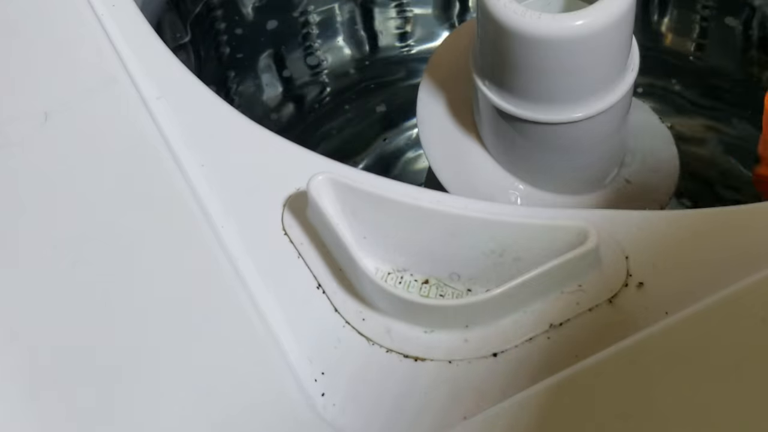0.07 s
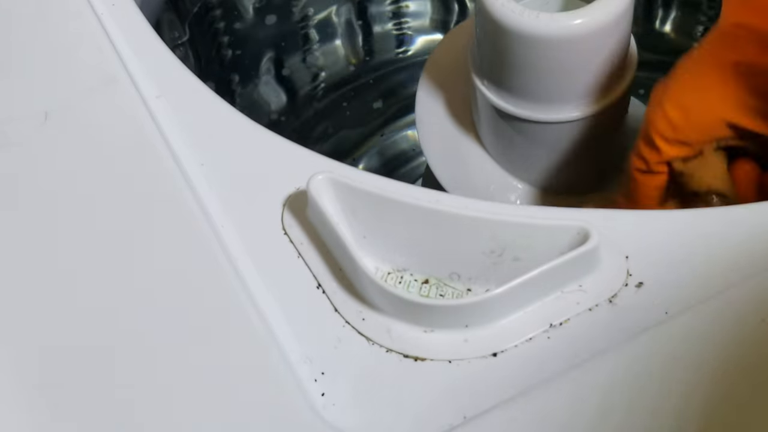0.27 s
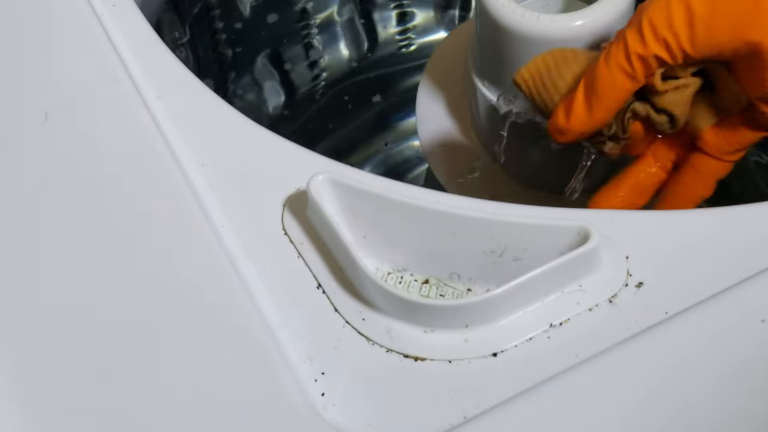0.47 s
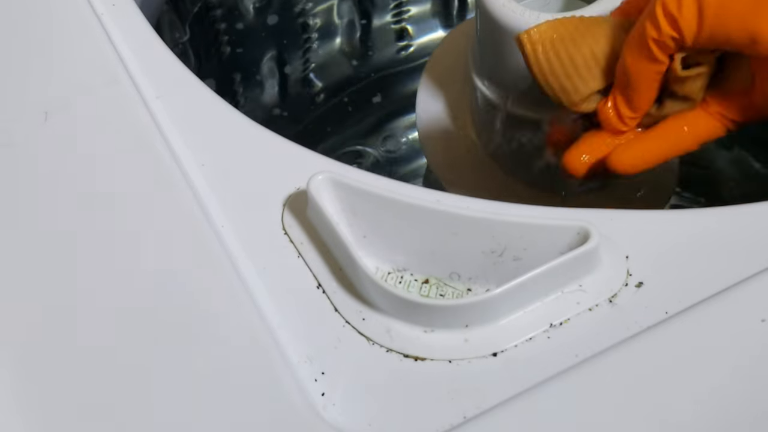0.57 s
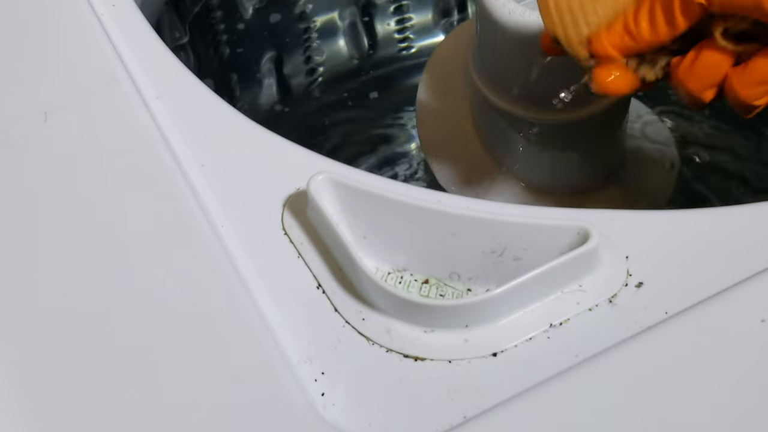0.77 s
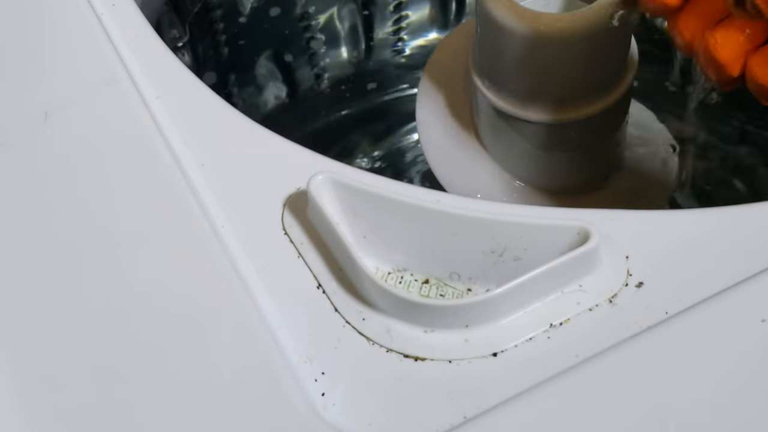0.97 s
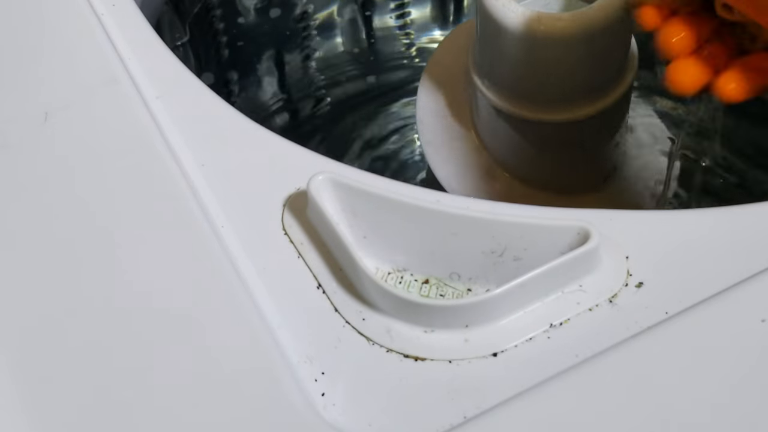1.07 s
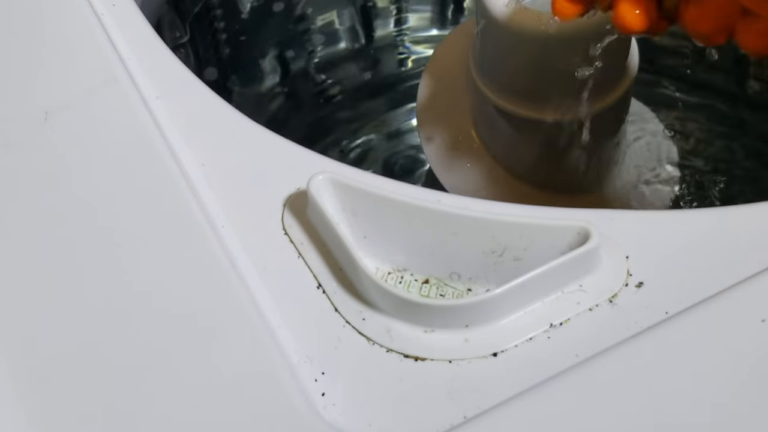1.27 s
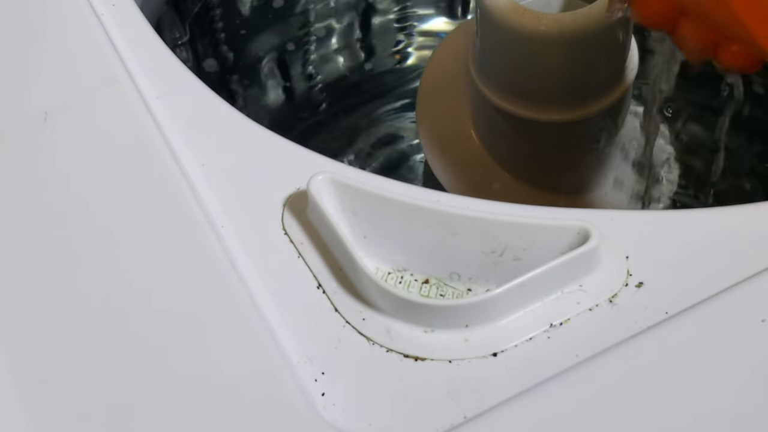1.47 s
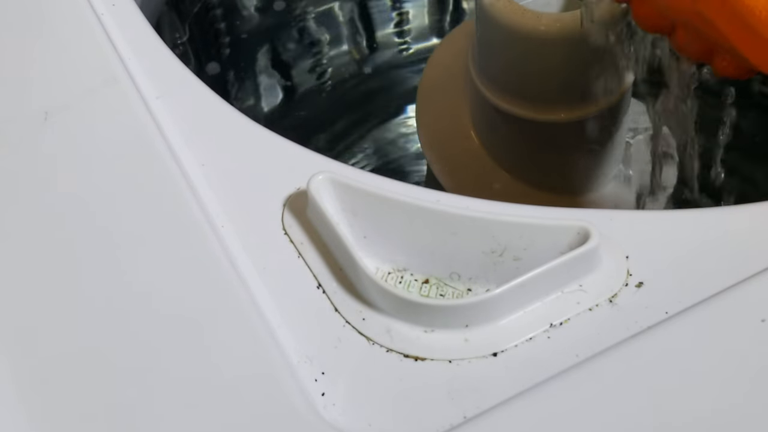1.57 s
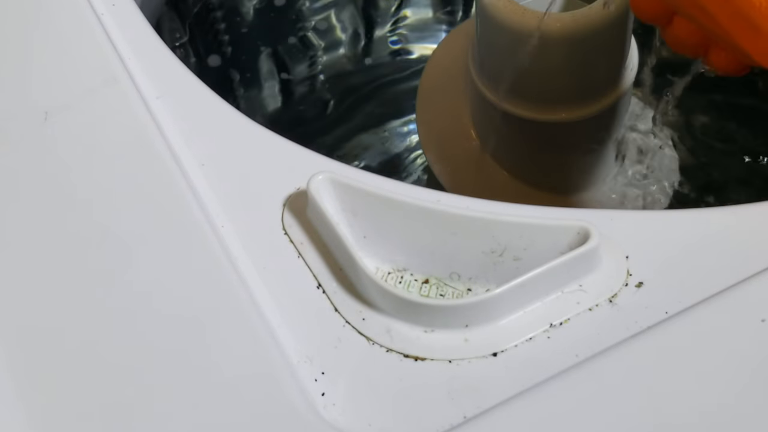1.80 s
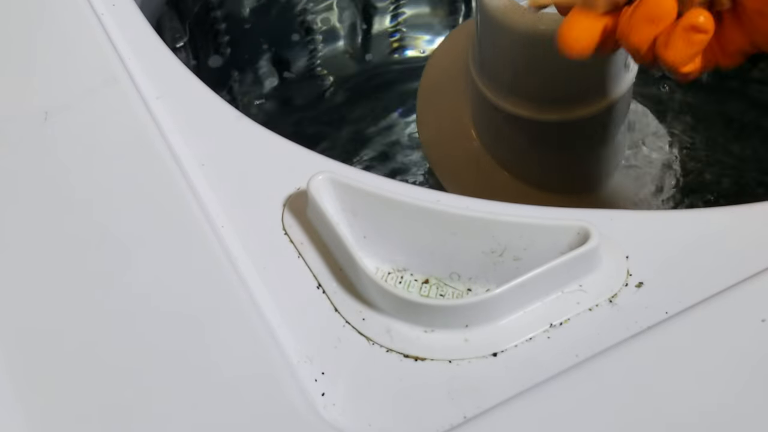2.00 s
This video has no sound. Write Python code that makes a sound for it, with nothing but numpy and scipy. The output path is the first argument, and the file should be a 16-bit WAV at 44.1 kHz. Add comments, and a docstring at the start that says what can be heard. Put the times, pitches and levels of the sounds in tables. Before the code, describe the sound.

Water drips and trickles from a wrung cloth into a washing machine's steel tub, close by in a small room. Light splats begin around 0.2 seconds, with a ringing plunk and a plop near 0.6. A thin stream runs from about 1.2 seconds, swelling into a fizzing gush from 1.5 to 1.7, then easing into bubbly drips by 2 seconds. A deep machine hum swells and sinks underneath throughout.

```python
"""Wringing a cloth over a steel tub.

A wet cloth is wrung out by hand over the water in a washing machine's tub. The cloth fizzes,
drops splat, bubbles plop, a thin stream runs, then a gush falls in; the tub rings with it.
Under the water sounds, a deep machine hum swells and sinks in a small room."""
import sys
import numpy as np
from scipy import signal
from scipy.fft import rfft, irfft
from scipy.io import wavfile
from scipy.ndimage import uniform_filter1d

SR = 44100
rng = np.random.default_rng(int(sys.argv[2]) if len(sys.argv) > 2 else 0)


def bounce(signal):
    """Save signal as a 16-bit WAV file at the path given by the first command-line argument."""
    frames = np.transpose(np.atleast_2d(signal))
    limited = np.clip(frames, -1, 1)
    pcm = np.round(limited * 32767).astype(np.int16)
    wavfile.write(sys.argv[1], SR, pcm)


N = 90008

# hum fundamental (time [s], level [dB])
HUM_LEVEL = [(0, -23.5), (.11, -22), (.25, -33.5), (.40, -21), (.56, -29), (.70, -22.5), (.89, -29),
             (1.0, -25), (1.35, -24.5), (1.73, -31), (1.89, -21), (2.04, -28)]
# hum overtones (frequency [Hz], level [dB])
HUM_PARTIALS = [(59.3, -47.5), (63.2, -45.5), (89.2, -51.5)]
# room rumble (time [s], level [dB])
RUMBLE_LEVEL = [(0, -35.5), (.2, -42), (.85, -45.5), (1.4, -41)]
# room rumble (frequency [Hz], gain [dB])
RUMBLE_SPECTRUM = [(20, -0.5), (110, -1), (180, -9), (3000, -26.5), (9000, -47.5)]
# running water (time [s], level [dB])
TRICKLE_LEVEL = [(0, -57.5), (.15, -64), (.24, -51), (.60, -43.5), (.885, -49.5), (1.15, -43), (1.66, -36),
                 (2.04, -47)]
# running water (frequency [Hz], gain [dB])
TRICKLE_SPECTRUM = [(250, -12), (500, -5), (1150, -5), (2000, -1), (5500, -4.5), (8000, -13.5),
                    (16000, -31)]
# fine spray (time [s], level [dB])
SPRAY_LEVEL = [(.43, -58), (.60, -46.5), (.87, -56.5), (1.15, -44), (1.41, -52.5), (1.52, -37.5),
               (2.04, -54.5)]
# fine spray (frequency [Hz], gain [dB])
SPRAY_SPECTRUM = [(1500, -42), (6000, -3.5), (8800, -8), (12000, -3)]
# spurts of fizz (peak time [s], level [dB])
SPRAY_SPURTS = [(.228, -44), (1.154, -37.5), (1.317, -40.5), (1.623, -31.5), (1.682, -31), (1.87, -39.5)]
# water landing (time [s], centre [Hz], spread [octaves], level [dB], fade [s])
SPLAT_EVENTS = [(.184, 2400, 0.56, -45.5, 0.15), (.350, 3020, 0.54, -41.5, 0.012),
                (.476, 2700, .45, -39, 0.023), (.520, 3900, 0.24, -41.5, 0.043),
                (.648, 1246, 0.37, -34.5, 0.0055), (0.663, 4600, 0.34, -39.5, .0042),
                (.719, 5260, 0.56, -39.5, 0.0029), (.808, 1734, 0.48, -40.5, 0.011),
                (0.915, 2320, 0.77, -37.5, 0.015), (0.996, 4730, 0.63, -40.5, 0.023),
                (1.069, 4430, 0.55, -31, 0.03), (1.075, 1810, 0.28, -36, 0.0093),
                (1.148, 2400, 0.49, -29.5, 0.017), (1.475, 5040, .24, -27, 0.021),
                (1.521, 3130, 0.36, -27.5, 0.11), (1.575, 2500, 0.28, -29, 0.0087),
                (1.610, 4400, 0.46, -27.5, 0.036), (1.826, 4620, 0.24, -33, 0.0096),
                (1.884, 1160, 0.52, -33.5, 0.0097)]
# single bubbles (time [s], pitch [Hz], level [dB], T60 [s])
BUBBLE_EVENTS = [(.25, 1960, -35.5, 0.017), (0.326, 1332, -40.5, 0.058), (.550, 1344, -27.5, 0.0085),
                 (.648, 683, -36, 0.066), (.657, 605.4, -24, 0.074), (0.816, 1512, -46, 0.037),
                 (1.109, 1280, -40, .035), (.922, 1750, -39, 0.017), (1.144, 1690, -27, 0.023),
                 (1.163, 2780, -35, 0.032), (1.530, 3030, -35, 0.022), (1.583, 1134, -29.5, 0.0072),
                 (1.588, 3570, -29, 0.0061), (1.639, 2480, -35.5, 0.027), (1.676, 1510, -28.5, 0.016),
                 (1.685, 1660, -31, 0.013), (1.701, 1580, -35.5, 0.0072), (1.726, 1730, -34, 0.0073),
                 (1.749, 2135, -32.5, 0.045), (1.766, 2185, -34.5, 0.018), (1.893, 863, -28, 0.12),
                 (1.942, 1035, -36.5, 0.017), (1.978, 1220, -31.5, 0.046)]
# tub modes struck by a heavy drop (frequency [Hz], gain [dB])
PLUNK_PARTIALS = [(1044, 5), (1174, 7), (1534, 1)]
# bands the stream excites (centre [Hz], half-width [Hz], level [dB])
STREAM_RESONANCES = [(1878, 44, -44), (2700, 260, -44), (3940, 110, -47.5)]
# gush (frequency [Hz], gain [dB])
GUSH_SPECTRUM = [(200, -8), (600, -1), (850, -2.5), (2500, 0.5), (5500, -2), (8500, -35)]
# tub air modes (frequency [Hz], gain [dB])
AIR_MODES = [(608, -8.5), (668, -7), (787, -6.5), (1007, -6.5), (1198, -5), (1533, -6.5), (1692, -15.5)]
# decay of tub wall reflections (frequency [Hz], T60 [s])
WALL_DECAY = [(2500, 0.25), (15000, 0.053)]
# stereo side signal (frequency [Hz], gain [dB])
SIDE_SPECTRUM = [(900, -28), (9000, -18)]

TRICKLE_DROPS = dict(rate_per_s=2600, spread_db=3.9, ring_cycles=3.54)
BUBBLE_RISE_PER_S = 1.38


def amp(db):
    """Decibels to gain."""
    return 10 ** (np.asarray(db) / 20)


def unit(x):
    """Scale to rms 1."""
    return x / np.sqrt(np.mean(x ** 2) + 1e-20)


def decay(t, t60_s):
    """Envelope falling 60 dB in t60_s."""
    return amp(-60 * t / t60_s)


def read(points, hz):
    """Interpolate over log frequency."""
    f, value = np.transpose(points)
    return np.interp(np.log(hz + 1), np.log(f + 1), value)


def level(points):
    """Gain over time from a dB curve."""
    return amp(np.interp(np.arange(N) / SR, *np.transpose(points)))


def colour(x, spectrum):
    """Filter by a dB spectrum."""
    return irfft(rfft(x) * amp(read(spectrum, np.fft.rfftfreq(len(x), 1 / SR))), len(x))


def add(mix, start_s, sound):
    """Mix a sound in at start_s."""
    part = mix[max(0, round(start_s * SR)):][:len(sound)]
    part += sound[:len(part)]


def loudest(x, db):
    """Set the rms of the loudest 20 ms."""
    return x * amp(db) / np.sqrt(uniform_filter1d(x ** 2, 880, mode="constant").max() + 1e-20)


def tub(direct_db=-4, modes_db=-12.5, modes_t60_s=0.33, room_db=-8, room_t60_s=1, low_hz=383):
    """Impulse response of one spot: direct sound, wall reflections, air modes, room."""
    size = SR // 2
    t = np.arange(size) / SR
    bins_hz, frames_s, noise = signal.stft(rng.standard_normal(size), SR, nperseg=256)
    damped = noise * decay(frames_s, read(WALL_DECAY, bins_hz)[:, None])
    walls = signal.istft(damped, SR, nperseg=256)[1][:size]
    room = rng.standard_normal(size) * decay(t, room_t60_s)
    modes = sum(amp(db) * unit(np.sin(2 * np.pi * (hz * t + rng.random())) * decay(t, modes_t60_s))
                for hz, db in AIR_MODES)
    echo = (unit(walls) + amp(room_db) * unit(room) + amp(modes_db) * modes) / np.sqrt(size)
    echo[0] += amp(direct_db)
    # little ring below the first air modes
    return signal.sosfilt(signal.butter(2, low_hz, "high", fs=SR, output="sos"), echo)


def drops(rate_per_s, spread_db, ring_cycles, pitches=28):
    """Patter of tiny droplets and bubbles: rising pings, a few of them loud."""
    t, out = np.arange(SR // 30) / SR, np.zeros(N)
    hits = amp(spread_db * np.minimum(rng.exponential(1, N), 4))
    hits *= rng.random(N) < rate_per_s / SR
    hits *= rng.choice([-1, 1], N)
    pitch_index = rng.integers(0, pitches, N)
    for k, hz in enumerate(np.geomspace(400, 16000, pitches)):
        phase = 2 * np.pi * hz * t * (1 + BUBBLE_RISE_PER_S * t)
        ping = hz * np.sin(phase) * np.exp(-hz * t / ring_cycles)
        out += signal.fftconvolve(hits * (pitch_index == k), ping)[:N]
    return unit(out)


def falling(spectrum, envelope, **patter):
    """Shaped droplet patter heard through the tub."""
    echo = tub()
    droplets = unit(colour(drops(**patter), spectrum)) * envelope
    return signal.fftconvolve(droplets, echo / np.linalg.norm(echo))[:N]


def hum(fundamental_hz=30.2):
    """Machine hum: a swelling fundamental and weak beating overtones."""
    t = np.arange(N) / SR
    fundamental = level(HUM_LEVEL) * np.sin(2 * np.pi * fundamental_hz * t)
    overtones = sum(amp(db) * np.sin(2 * np.pi * (hz * t + rng.random())) for hz, db in HUM_PARTIALS)
    return np.sqrt(2) * (fundamental + overtones)


def rumble():
    """Low noise of the room."""
    return level(RUMBLE_LEVEL) * unit(colour(rng.standard_normal(N), RUMBLE_SPECTRUM))


def trickle():
    """Droplets run from the cloth into the tub."""
    return falling(TRICKLE_SPECTRUM, level(TRICKLE_LEVEL), **TRICKLE_DROPS)


def spray(rise_s=0.017, fade_s=0.038):
    """Air and water fizz out of the cloth: a dense hiss swelling with each spurt."""
    t, power = np.arange(N) / SR, level(SPRAY_LEVEL) ** 2
    for peak_s, db in SPRAY_SPURTS:
        spurt = np.exp(-np.maximum((peak_s - t) / rise_s, (t - peak_s) / fade_s))
        power += (amp(db) * spurt) ** 2
    fizz = drops(rate_per_s=18000, spread_db=1.5, ring_cycles=0.63)
    return unit(colour(fizz, SPRAY_SPECTRUM)) * np.sqrt(power)


def splats(spikiness=1.88, attack_s=0.00013):
    """Each blob of water lands as a fading cluster of clicks."""
    t, out = np.arange(SR // 5) / SR, np.zeros(N)
    hz = np.fft.rfftfreq(len(t), 1 / SR) + 1
    for start_s, centre_hz, octaves, db, fade_s in SPLAT_EVENTS:
        noise = rng.standard_normal(len(t))
        clicks = np.sign(noise) * abs(noise) ** spikiness
        band = (1 + (np.log2(hz / centre_hz) / octaves) ** 2 / 2) ** -2
        envelope = np.exp(-t / fade_s) * (1 - np.exp(-t / attack_s))
        burst = irfft(rfft(clicks) * band, len(t)) * envelope
        add(out, start_s, loudest(signal.fftconvolve(burst, tub()), db))
    return out


def bubbles(attack_cycles=0.66):
    """Each trapped bubble rings briefly, rising in pitch as it nears the surface."""
    t, out = np.arange(SR // 6) / SR, np.zeros(N)
    for start_s, hz, db, t60_s in BUBBLE_EVENTS:
        phase = 2 * np.pi * hz * (t + BUBBLE_RISE_PER_S * t ** 2 / 2)
        ring = np.sin(phase) * decay(t, t60_s) * (1 - np.exp(-t * hz / attack_cycles))
        add(out, start_s, loudest(signal.fftconvolve(ring, tub(direct_db=-2.5)), db))
    return out


def plunk(start_s=0.55, level_db=-29.5, t60_s=0.31):
    """One heavy drop sets the tub ringing."""
    t, out = np.arange(SR) / SR, np.zeros(N)
    ring = sum(amp(db) * np.sin(2 * np.pi * hz * t) for hz, db in PLUNK_PARTIALS)
    add(out, start_s, loudest(ring * decay(t, t60_s), level_db))
    return out


def stream(start_s=1.17, end_s=1.72, ramp_s=0.21):
    """A thin stream drums on the water and keeps a few resonances sounding."""
    t, hz = np.arange(N) / SR, np.fft.rfftfreq(N, 1 / SR)
    patter = rfft(drops(**TRICKLE_DROPS))
    bands = sum(amp(db) * unit(irfft(patter / (1 + ((hz - centre_hz) / half_width_hz) ** 2), N))
                for centre_hz, half_width_hz, db in STREAM_RESONANCES)
    return bands * np.clip(np.minimum(t - start_s, end_s - t) / ramp_s, 0, 1)


def gush(start_s=1.51, rise_s=0.01, release_s=1.688, fade_s=0.025, level_db=-31):
    """A hard squeeze sends a dense fall of drops into the tub."""
    t = np.arange(N) / SR
    attack = np.clip((t - start_s) / rise_s, 0, 1)
    envelope = amp(level_db) * attack * np.exp(-np.maximum(t - release_s, 0) / fade_s)
    return falling(GUSH_SPECTRUM, envelope, rate_per_s=6000, spread_db=3.9, ring_cycles=2.4)


def scene(left_db=-0.25):
    """Near mono: water a hair to the right, its treble slightly widened by reflections."""
    water = bubbles() + plunk() + splats() + trickle() + gush() + spray() + stream()
    scatter = rng.standard_normal(SR // 100)
    reflections = signal.fftconvolve(water, scatter / np.linalg.norm(scatter))[:N]
    side = colour(reflections, SIDE_SPECTRUM)
    return np.array([amp(left_db) * water + side, water - side]) + hum() + rumble()


def record(dry):
    """Low-pass at 15.8 kHz."""
    lowpass = signal.firwin(511, 15800, window=("kaiser", 9), fs=SR)
    return signal.oaconvolve(dry, lowpass[None], "same")


dry = scene()
out = record(dry)
bounce(out)
```